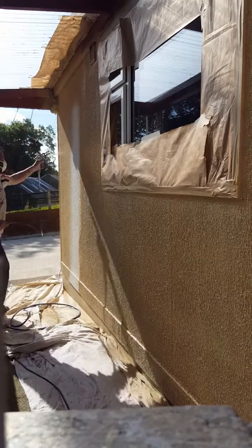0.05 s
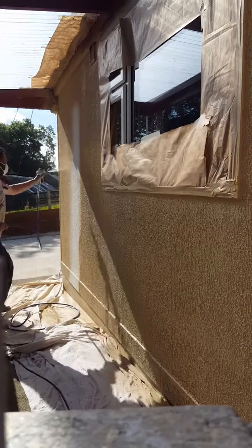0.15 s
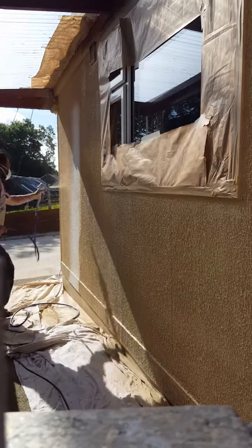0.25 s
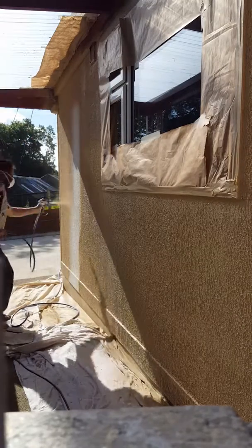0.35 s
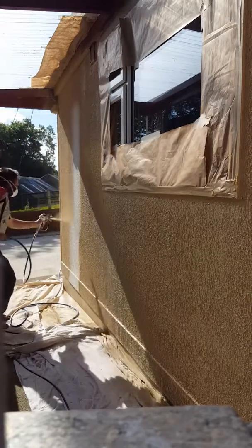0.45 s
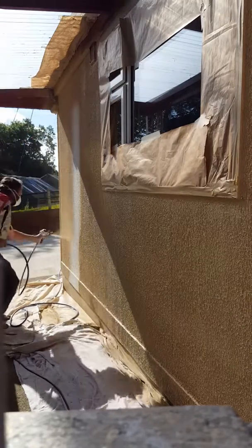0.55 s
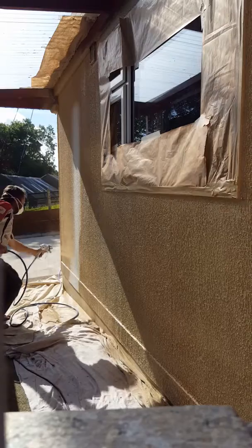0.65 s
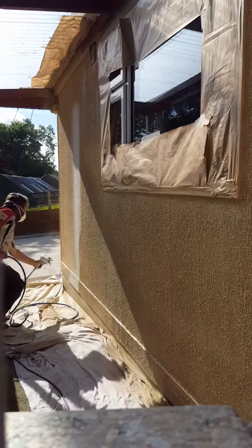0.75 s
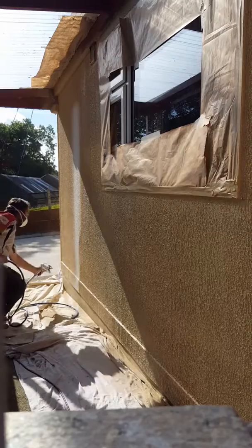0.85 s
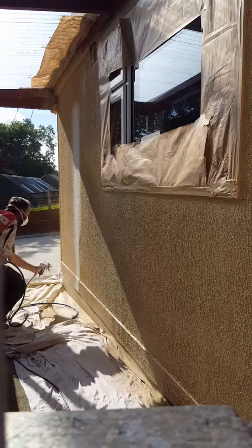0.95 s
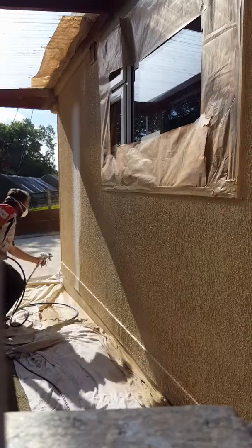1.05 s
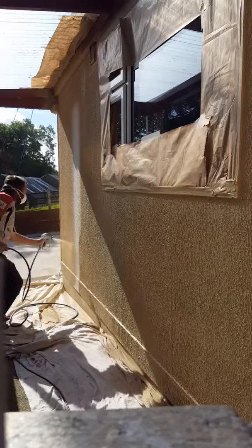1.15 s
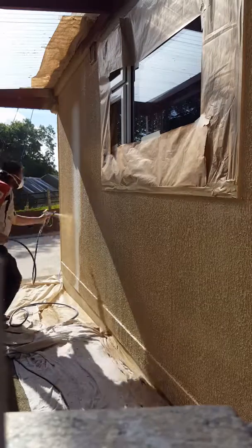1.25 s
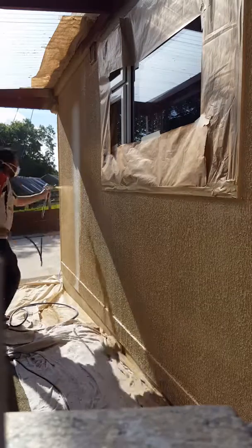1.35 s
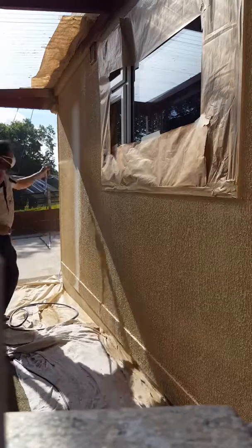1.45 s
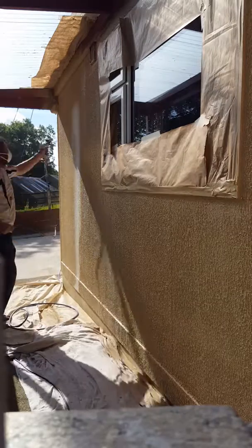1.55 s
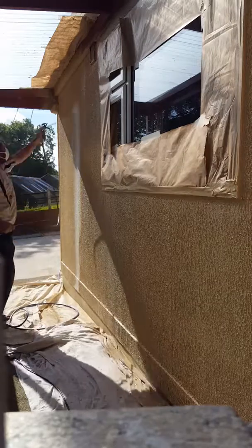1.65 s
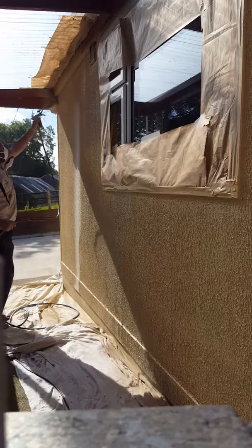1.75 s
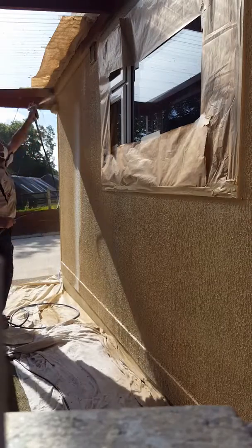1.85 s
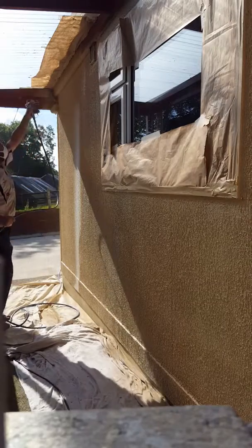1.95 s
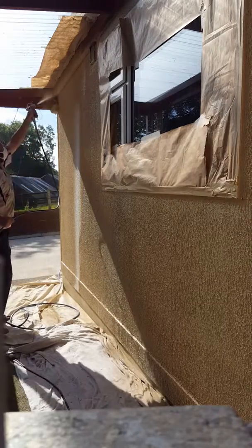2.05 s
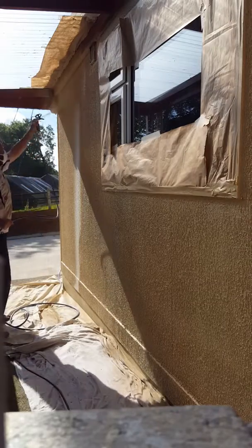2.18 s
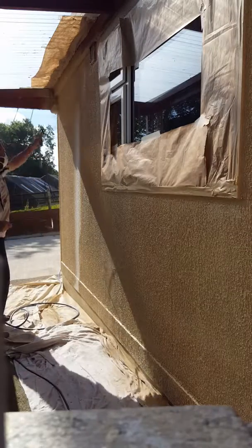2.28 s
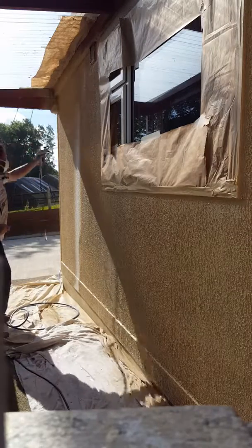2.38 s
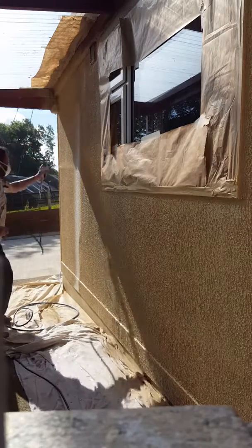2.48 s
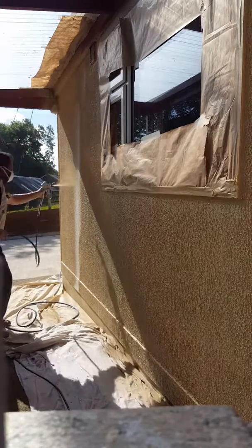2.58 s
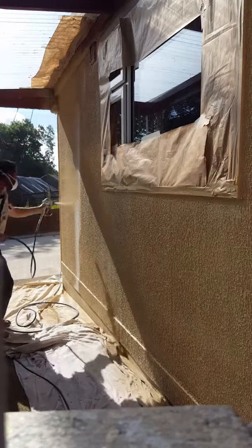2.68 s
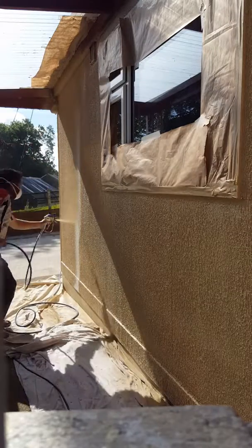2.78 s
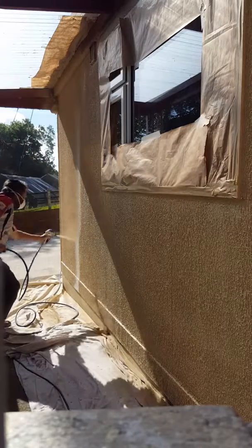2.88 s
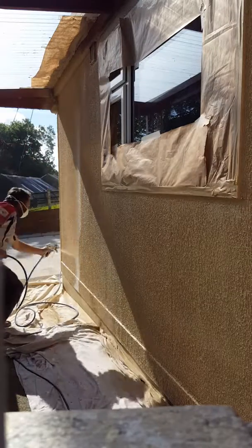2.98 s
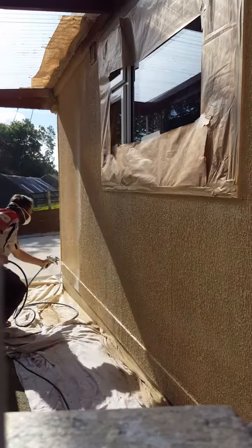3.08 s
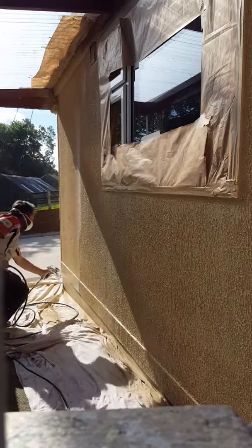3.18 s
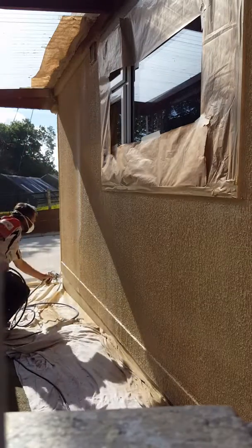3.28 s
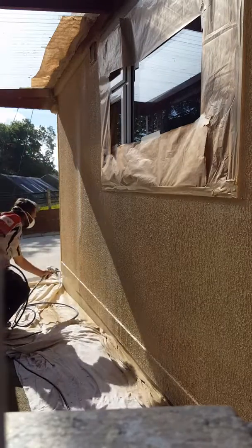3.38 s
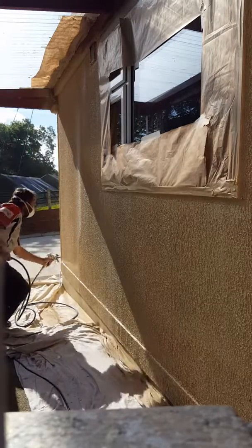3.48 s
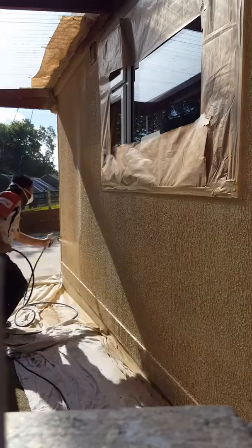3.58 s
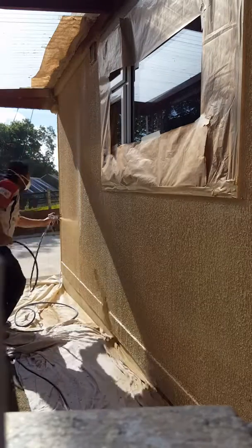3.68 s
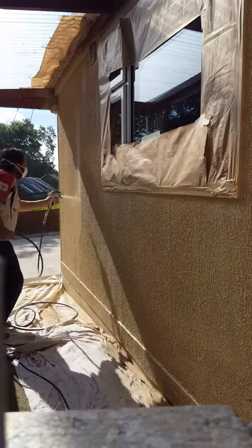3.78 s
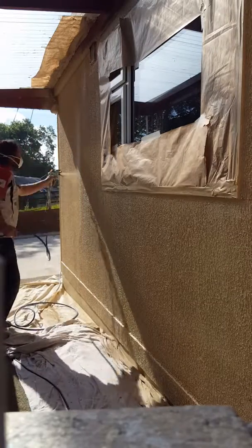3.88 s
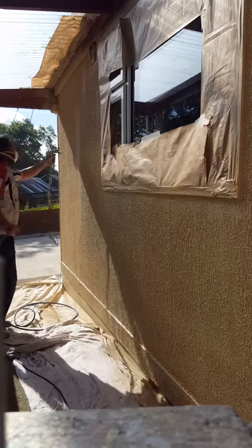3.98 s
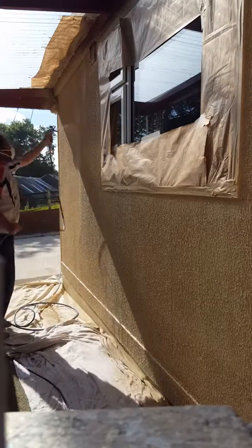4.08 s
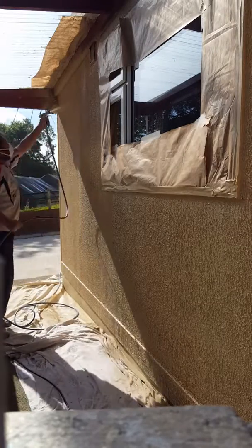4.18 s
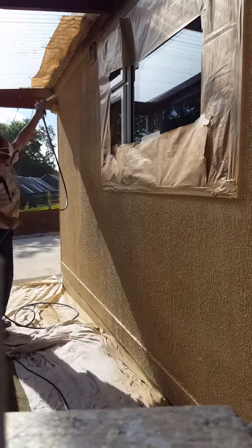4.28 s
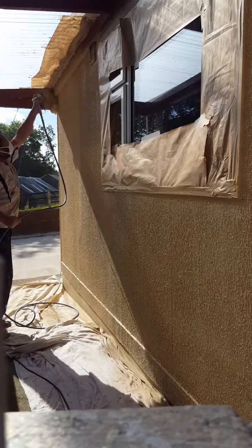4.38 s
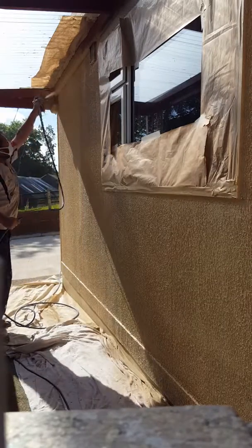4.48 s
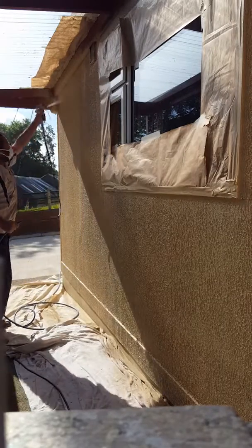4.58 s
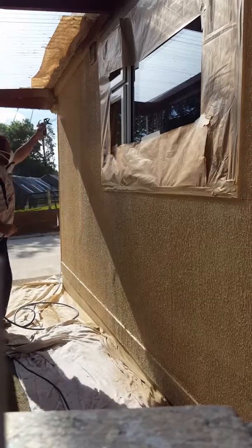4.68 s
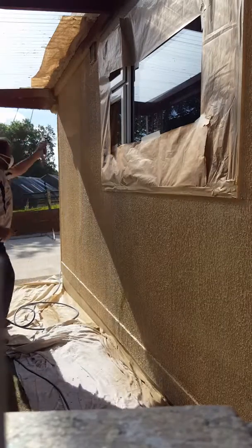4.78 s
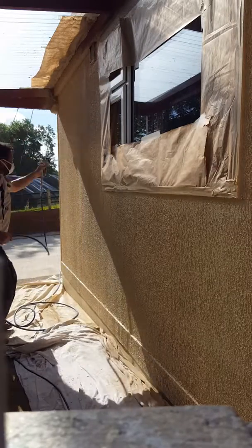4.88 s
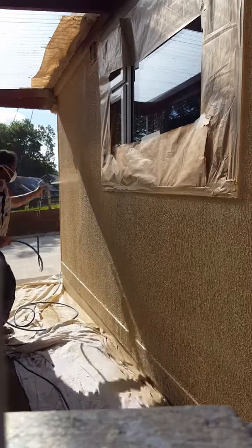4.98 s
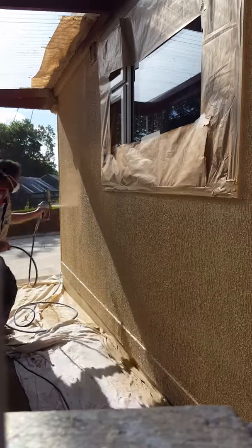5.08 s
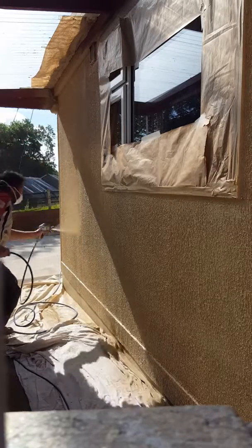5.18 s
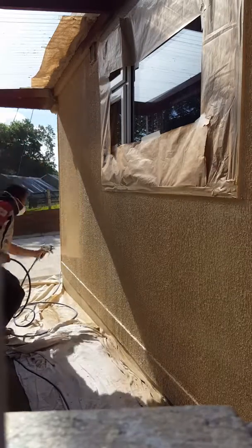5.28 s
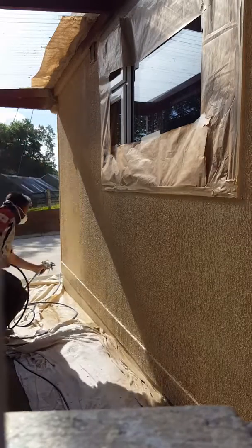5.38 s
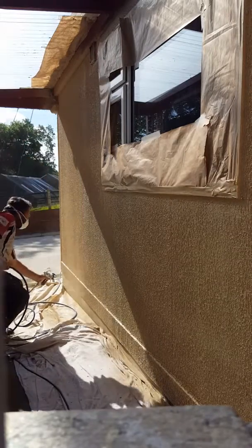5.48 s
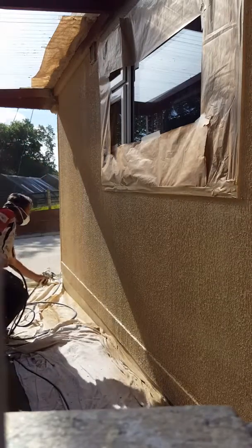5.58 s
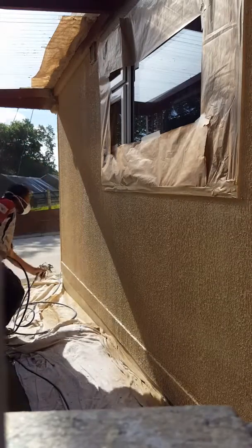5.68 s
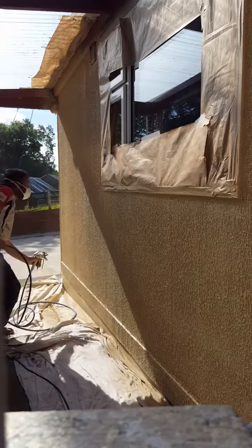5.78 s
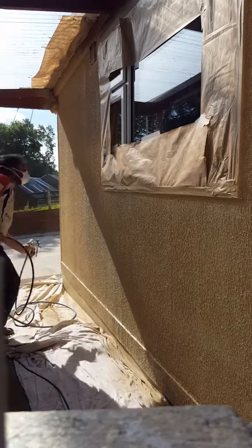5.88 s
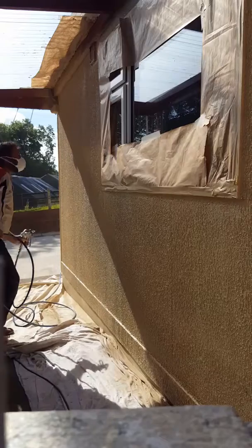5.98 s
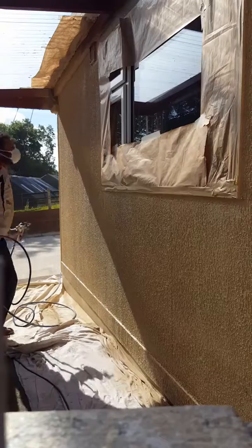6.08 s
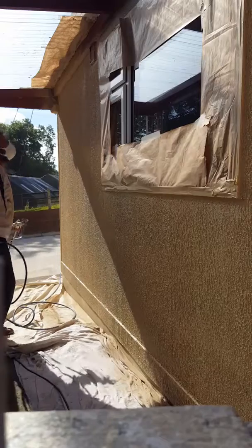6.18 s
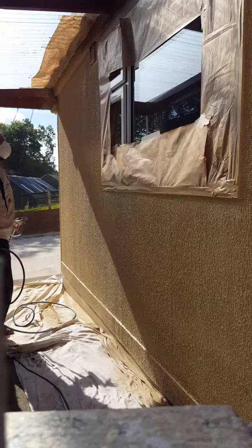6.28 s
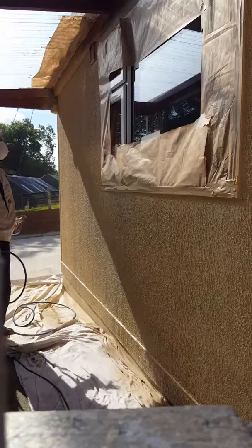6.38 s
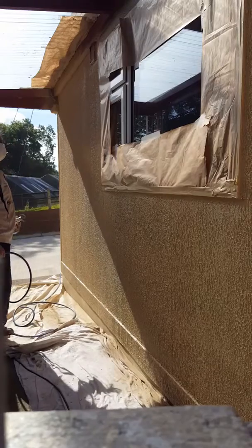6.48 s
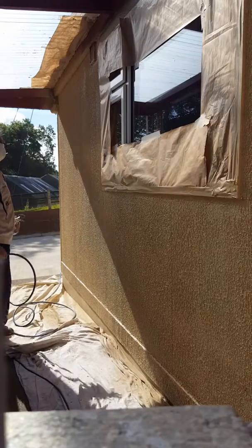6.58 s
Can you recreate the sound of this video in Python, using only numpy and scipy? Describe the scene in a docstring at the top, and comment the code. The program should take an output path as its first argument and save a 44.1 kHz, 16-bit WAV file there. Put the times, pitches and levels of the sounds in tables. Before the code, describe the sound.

In an open yard, a spray gun coats a house wall with a loud, bright hiss, stopping for an instant between five long sweeps. The hiss shifts slightly in tone as the gun moves. Under it, a piston pump knocks rapidly and whirs close by on the right of the stereo microphones. The spraying ends and the pump winds down, leaving a low, faraway engine hum and soft outdoor air.

```python
"""An airless sprayer hisses paint onto an outside wall in five long passes, with short breaks between.
Paint tears into mist at the tip, and echoes off wall, eave and ground shift as the arm moves.
Nearby, a little to the right, its piston pump knocks and whirs, then coasts to a stop once the gun
stays shut. An engine drones further off in the open yard. Two microphones hear it in stereo."""
import sys
import numpy as np
from scipy import signal
from scipy.fft import rfft, irfft
from scipy.io import wavfile
from scipy.ndimage import uniform_filter1d, map_coordinates

SR = 44100
rng = np.random.default_rng(int(sys.argv[2]) if len(sys.argv) > 2 else 0)


def waveform_to_disk(signal):
    """Save audio, clipped to [-1, 1], as 16-bit WAV at the path in sys.argv[1]."""
    frames = np.transpose(np.atleast_2d(signal))
    scaled = np.clip(frames, -1, 1) * 32767
    samples = np.round(scaled).astype(np.int16)
    wavfile.write(sys.argv[1], SR, samples)


N = 293104
TIME = np.arange(N) / SR
BIN_HZ = np.fft.rfftfreq(N, 1 / SR)


def amp(db):
    """Decibels to gain."""
    return 10 ** (np.asarray(db) / 20)


def unit_rms(x):
    """Scales to rms 1."""
    return x / np.sqrt(np.mean(x ** 2) + 1e-20)


def over_hz(points):
    """Reads a curve at every bin, on a log-frequency axis."""
    hz, value = np.transpose(points)
    return np.interp(np.log(BIN_HZ + 1), np.log(hz), value)


def filtered(x, gain):
    """Filters by a gain for each frequency."""
    return irfft(rfft(x) * gain, N)


def lowpass(x, hz, order):
    """Keeps what lies below a frequency."""
    return filtered(x, 1 / (1 + (BIN_HZ / hz) ** order))


def wander(rate_hz):
    """Smooth random drift of rms 1."""
    return unit_rms(filtered(rng.standard_normal(N), np.exp(-(BIN_HZ / rate_hz) ** 2)))


def bell(hz, width_hz):
    """A bell curve of height 1 along frequency."""
    return np.exp(-2 * ((BIN_HZ - hz) / width_hz) ** 2)


def add(mix, start_s, sound):
    """Mixes a sound in at a time."""
    part = mix[max(round(start_s * SR), 0):][:len(sound)]
    part += sound[:len(part)]


# How alike the two microphones hear the air. Each row: frequency in Hz, left-right correlation.
MIC_CORRELATION = [(30, .94), (100, 1), (250, 0.88), (550, 0.5), (1050, 0.65), (1650, -0.42), (2200, -0.29),
                   (2650, 0.48), (3300, -0.066), (14000, 0.093)]


def air_noise(colour_db, left_over_right_db=0):
    """Turbulent noise of rms 1 at the two microphones: alike in the bass, unrelated in the treble."""
    left, unrelated = rng.standard_normal((2, N))
    alike = np.clip(over_hz(MIC_CORRELATION), -1, 1)
    right = filtered(left, alike) + filtered(unrelated, np.sqrt(1 - alike ** 2))
    even = np.ones(len(BIN_HZ))
    tilt = amp(left_over_right_db) * even
    balance = np.array([tilt, even]) / np.hypot(tilt, 1)
    return unit_rms(filtered(np.array([left, right]), amp(colour_db) * balance))


# Open air all round the microphones. Each row: frequency in Hz, relative noise density in dB.
YARD_SPECTRUM = [(15, -66), (30, -20), (65, -7), (120, -1.5), (160, -9), (195, -8), (260, -17.5),
                 (560, -17.5), (720, -14.5), (1150, -12), (2700, -29.5), (4200, -33), (8000, -43.5),
                 (14000, -65)]


def yard(level_db=-43.0, gust_db=3):
    """The soft wash of the open yard, with a rumble that comes and goes beneath it."""
    wash = air_noise(over_hz(YARD_SPECTRUM))
    gusts = lowpass(wash, hz=70, order=8) * (amp(gust_db * wander(5.8)) - 1)
    return amp(level_db) * (wash + gusts)


# The pace of the engine across the yard. Each row: time in seconds, firings per second.
FIRING_RATE = [(0, 21.95), (1.1, 21.9), (1.6, 22.4), (2.7, 22.45), (3.6, 22.25), (5.2, 22.2), (6.65, 22.0)]


def engine(level_db=-46.0, pipe_hz=117, puff_s=0.038, fan_db=-52.0, overtone_db=-57):
    """Further off, each firing puffs through the muffler; the cooling fan hums along."""
    rate = np.interp(TIME, *np.transpose(FIRING_RATE))
    firings = np.cumsum(rate) / SR + 0.0089 * wander(6.3)
    offset_s = (firings % 1 - .5) / rate  # from the middle of each puff
    envelope = np.exp(-.5 * (offset_s / puff_s) ** 2) * np.cos(np.pi * offset_s * rate)
    uneven_db = 0.5 * np.cos(np.pi * (firings - .5)) + 1.5 * wander(24)  # strong and weak, plus chance
    puffs = np.sin(2 * np.pi * pipe_hz * offset_s) * envelope * amp(uneven_db)
    exhaust = amp(level_db) * unit_rms(lowpass(puffs, hz=200, order=10))
    fan_hz = 4.18 * rate
    fan_angle = 2 * np.pi * np.cumsum(fan_hz) / SR + .5 * wander(4.6)
    hum = amp(fan_db) * unit_rms(np.sin(fan_angle) * amp(1.7 * wander(6.3)))
    overtone = amp(overtone_db) * unit_rms(np.sin(2 * fan_angle) * amp(2.4 * wander(10.0)))
    effort_db = 5 * (rate - rate.mean())  # louder as it speeds up
    return (exhaust + hum + overtone) * amp(effort_db)


# The nearby pump: first piston reversal, time between reversals, and the moment its motor cuts out.
FIRST_STROKE_S, STROKE_S, CUT_OUT_S = .082, .18135, 6.12


def motor(full_speed_db=-35, db_per_octave=36, slowing_per_s=.17, coast_s=0.28):
    """Level in dB and share of full speed: after the last pass it labours, cuts out and coasts."""
    shut_s = np.maximum(TIME - SPRAY_PASSES[-1][1], 0)
    labouring = np.clip(1 - slowing_per_s * shut_s, .1, 1)
    coasting = np.exp(-np.maximum(TIME - CUT_OUT_S, 0) / coast_s)
    speed = labouring * coasting
    return full_speed_db + db_per_octave * np.log2(speed), speed


def swell(strokes, centre, width):
    """A hump of height 1 that comes back with every stroke."""
    return np.exp(-(((strokes - centre + .5) % 1 - .5) / width) ** 2)


def piston_load(strokes):
    """The load on the gears, rising and falling between -1 and 1 in each stroke."""
    return np.cos(2 * np.pi * (strokes - .3))


def pump_tone(hz, waver=0, right_db=7, lag_rad=1.38):
    """A tone from the pump: louder at the right microphone, and out of step between the two."""
    angle = 2 * np.pi * np.cumsum(hz * np.ones(N)) / SR + waver
    return unit_rms(np.array([np.sin(angle), amp(right_db) * np.sin(angle - lag_rad)]))


# Faint squeaks of a closing valve.
# Each row: start in seconds, length in seconds, pitch in Hz, bandwidth in Hz, top level in dB.
VALVE_SQUEAKS = [(5.78, .2, 6130, 550, -58), (5.953, 0.1, 6030, 350, -57), (6.144, 0.059, 6530, 50, -57)]


def valve_squeaks():
    """Paint squeezes past a valve seat as the pressure tops out."""
    out = np.zeros(N)
    for start_s, length_s, hz, width_hz, db in VALVE_SQUEAKS:
        whistle = unit_rms(filtered(rng.standard_normal(N), bell(hz, width_hz)))
        out += amp(db) * whistle * np.sin(np.pi * np.clip((TIME - start_s) / length_s, 0, 1))
    return out


# Notes from the pump, off to the right. Each row: peak time in seconds, pitch in Hz, top level in dB.
PUMP_NOTES = [(.04, 1737, -39), (.24, 1737, -39), (1.31, 1737, -40), (2.25, 1737, -42), (2.41, 1737, -41),
              (2.59, 1737, -43), (4.58, 1795, -39), (4.76, 1737, -40), (4.95, 1737, -42), (5.85, 1750, -39)]


def pump_notes(swell_s=0.04):
    """Short clear notes: the housing rings, and once the gear whine stands out between passes."""
    waver = .4 * wander(30)
    return sum(pump_tone(hz, waver) * amp(db) * np.exp(-((TIME - peak_s) / swell_s) ** 2)
               for peak_s, hz, db in PUMP_NOTES)


def gear_whine(strokes, tooth_hz=1805, swing_hz=20, jitter_hz=16, rough_db=4.0, over_motor_db=-9):
    """The gear teeth whine twice in each stroke; the pitch follows motor speed and load."""
    motor_db, speed = motor()
    pitch_hz = tooth_hz * speed + swing_hz * piston_load(strokes) + jitter_hz * wander(131)
    mesh = .25 + swell(strokes, .87, .1) + .7 * swell(strokes, .24, .12)
    envelope = unit_rms(mesh * amp(rough_db * wander(83)))
    return pump_tone(pitch_hz) * envelope * amp(motor_db + over_motor_db)


# The pump's gears from nearby. Each row: frequency in Hz, relative noise density in dB.
GEAR_SPECTRUM = [(200, -20), (320, -11), (410, -2.5), (600, -6), (930, -5.5), (1200, -5.5), (1800, 0.5),
                 (2500, -11), (2850, -15.5), (4500, -15), (6100, -14), (8000, -21), (10000, -36.5),
                 (14500, -52)]
# Resonances of the housing around them. Each row: frequency in Hz, width in Hz, boost in dB.
HOUSING_MODES = [(395, 25, 3), (440, 25, 4), (482, 25, 3), (893, 24, 4), (952, 26, 5), (1091, 28, 5.5),
                 (1340, 28, 4.5), (1435, 40, 4), (1622, 40, 3.5), (1790, 60, 3), (2560, 200, 4)]
# The pump stands to the right. Each row: frequency in Hz, left microphone minus right in dB.
PUMP_BALANCE = [(900, 0.5), (1100, -4), (2000, -6), (5000, -6), (7500, 0)]


def pump_whir(strokes, shaft_hz=55, shaft_db=1.0, load_db=1.0, dip_db=-9, churn_db=-13.0):
    """Gears whir in the housing, louder under each stroke's load, and paint surges through the valves."""
    motor_db, speed = motor()
    colour_db = over_hz(GEAR_SPECTRUM) + sum(db * bell(hz, width) for hz, width, db in HOUSING_MODES)
    shaft_angle = 2 * np.pi * np.cumsum(shaft_hz * speed) / SR + wander(6.7)
    whir = air_noise(colour_db, over_hz(PUMP_BALANCE))
    whir *= amp(shaft_db * np.sin(shaft_angle) + load_db * piston_load(strokes))
    # the low mids of the whir dip twice in each stroke
    dip = swell(strokes, 0.85, 0.018) + 0.51 * swell(strokes, 0.3, 0.075)
    whir += lowpass(whir, hz=720, order=10) * (amp(dip_db * dip) - 1)
    # paint surges around the reversal and again in mid stroke
    surge = swell(strokes, 0.06, 0.18) + 0.43 * swell(strokes, 0.42, 0.1)
    churn = air_noise(over_hz([(150, -48), (250, 15.5), (450, -14), (800, -41.5), (2000, -69)]))
    return amp(motor_db) * (whir + amp(churn_db) * churn * surge)


def reversals(level_db=-39, spread_db=0.5, pause_db=-9):
    """Time and level of each knock while the motor has a full stroke left; softer between passes."""
    times = np.arange(FIRST_STROKE_S, CUT_OUT_S - STROKE_S, STROKE_S)
    paused = sum((times > last[1]) & (times < following[0])
                 for last, following in zip(SPRAY_PASSES, SPRAY_PASSES[1:]))
    return zip(times, level_db + pause_db * paused + spread_db * rng.standard_normal(len(times)))


# Modes of the pump frame. Each row: frequency in Hz, relative level in dB, seconds to fall 60 dB.
FRAME_MODES = [(240, -14, 0.072), (326, 3, 0.048), (388.4, -0.5, 0.092), (470, -10, 0.026),
               (562, -1, 0.061), (655, 3.5, 0.052), (964, 5.5, 0.042), (1083, 6, 0.042), (1317, 4, 0.063)]


def pump_knocks(rattle=0.3, rattle_s=0.014):
    """At each reversal a check ball seats and chatters, ringing the frame; alike at both microphones."""
    t, out = np.arange(SR // 6) / SR, np.zeros(N)
    ring = sum(amp(db - 60 * t / t60) * np.sin(2 * np.pi * hz * t) for hz, db, t60 in FRAME_MODES)
    for start_s, db in reversals():
        blow = rattle * rng.standard_normal(len(t)) * np.exp(-t / rattle_s)
        blow[0] += 2  # the ball hits its seat
        knock = signal.fftconvolve(blow, ring)
        attack_rms = np.sqrt(np.mean(knock[:SR // 100] ** 2))
        add(out, start_s, amp(db) * knock / attack_rms)
    return np.array([out, out])


def wall_echoes(x, share=0.2, count=4):
    """Wall, eave and ground send back early echoes whose paths change as the arm moves."""
    delays_s = [delay * (1 + 0.0494 * wander(1.49)) for delay in np.geomspace(.0014, .009, count)]
    return x + share * sum(map_coordinates(x, [(TIME - delay) * SR], order=3) for delay in delays_s)


# The gun's passes, down the wall and up again in turn.
# Each row: trigger pulled in seconds, trigger let go in seconds, relative level in dB.
SPRAY_PASSES = [(0, 1.083, -25.5), (1.2195, 2.056, -24.5), (2.169, 3.385, -24.6), (3.463, 4.506, -25),
                (4.623, 5.646, -24.5)]


def trigger(snap_s=.0017, spit_s=0.0023, build_s=0.019, first_share=0.49, tail_t60_s=.2):
    """The valve opens with a spit, the fan builds, and on release the hiss dies between wall and eave."""
    envelope = np.zeros(N)
    for pulled, released, _ in SPRAY_PASSES:
        age = np.maximum(TIME - pulled, 0)
        valve = 1 - np.exp(-age / snap_s)
        fan = 1 - (1 - first_share) * np.exp(-age / build_s)
        spit = np.exp(-age / spit_s)
        tail = amp(-60 * np.maximum(TIME - released, 0) / tail_t60_s)
        envelope += valve * (fan + spit) * tail
    return envelope


def arm_sweep(top_db=1, top_treble_db=1.5, sag_treble_db=3):
    """Level and treble in dB: louder and brighter high on the wall, duller as the hose pressure sags."""
    edges_s = [s for pulled, released, _ in SPRAY_PASSES for s in (pulled, released)]
    edge = np.arange(len(edges_s))
    height = np.cos(np.pi * np.interp(TIME, edges_s, (edge + 1) // 2)) / 2
    progress = np.interp(TIME, edges_s, edge % 2)
    pass_db = np.interp(TIME, edges_s, np.repeat([db for _, _, db in SPRAY_PASSES], 2))
    return pass_db + top_db * height, top_treble_db * height - sag_treble_db * progress


# The hiss of the paint fan at the wall. Each row: frequency in Hz, relative noise density in dB.
SPRAY_SPECTRUM = [(450, -39), (750, -18.5), (1200, -19), (2200, -6), (2900, -4.5), (3300, -5.5),
                  (4200, 0.3), (5600, 0), (7300, 1.5), (8400, -2), (9700, -9.5), (11000, -11.5),
                  (13200, -8), (14500, -14.5)]
# Its place between the microphones. Each row: frequency in Hz, left minus right in dB.
SPRAY_BALANCE = [(800, -9), (1800, -2), (4000, -5.5), (7000, -3.5), (8500, 1.5), (14000, 0.5)]


def spray(strokes, gain_db=3, flicker_db=0.96, pulse_db=0.21, fresh_db=1.0, fresh_s=0.5):
    """Paint tears into mist at the tip; echoes comb the hiss as the gun moves along the wall."""
    sweep_db, treble_db = arm_sweep()
    hiss = air_noise(over_hz(SPRAY_SPECTRUM), over_hz(SPRAY_BALANCE))
    treble = filtered(hiss, 1 / (1 + (8000 / (BIN_HZ + 1)) ** 8))
    edge = filtered(hiss, bell(7900, 1500))
    core = filtered(hiss, bell(3400, 1500))
    # pressure stored in the hose makes the start of each pass a little sharper
    fresh = sum((TIME > pulled) * np.exp(-abs(TIME - pulled) / fresh_s) for pulled, _, _ in SPRAY_PASSES)
    hiss += treble * (amp(treble_db - treble_db.mean()) - 1)
    hiss += edge * (amp(fresh_db * (fresh - fresh.mean()) + flicker_db * wander(16)) - 1)
    hiss += core * (amp(flicker_db * wander(22)) - 1)
    hiss = unit_rms(np.array([wall_echoes(side) for side in hiss]))
    pressure_db = pulse_db * np.cos(2 * np.pi * (strokes - .75))  # falling at each piston reversal
    breakup_db = 0.59 * wander(42.4) - 0.17 * wander(910)  # flutter and fine spatter
    return hiss * trigger() * amp(gain_db + sweep_db + pressure_db + breakup_db)


def scene():
    """The gun at the wall, the pump nearby and the engine across the yard, at the two microphones."""
    strokes = (TIME - FIRST_STROKE_S) / STROKE_S  # a whole number at each piston reversal
    gun = spray(strokes)
    pump = pump_whir(strokes) + gear_whine(strokes) + pump_notes() + pump_knocks() + valve_squeaks()
    return gun + pump + engine() + yard()


def suppressor(x, threshold_db=-31, floor_db=-19, low_hz=208, high_hz=640):
    """Turns down low mids that are faint against the loudness of the whole sound."""
    hz, _, spectra = signal.stft(x, SR, nperseg=1024, noverlap=768)
    power = np.mean(abs(spectra) ** 2, axis=0)
    local_power = uniform_filter1d(uniform_filter1d(power, size=5, axis=0), size=5, axis=1)
    band = 1 / (1 + (low_hz / (hz + 1)) ** 12) / (1 + (hz / high_hz) ** 6)
    threshold = amp(threshold_db) ** 2 * band[:, None] * power.sum(axis=0)
    gain = np.maximum(1 / (1 + (threshold / (abs(local_power) + 1e-18)) ** 4), amp(floor_db))
    return signal.istft(spectra * gain, SR, nperseg=1024, noverlap=768)[1][:, :N]


def record(dry, notch_hz=9780, notch_width_hz=1250, band_limit_hz=14560):
    """The right microphone's port cuts a notch; both sides then pass the suppressor and a band limit."""
    notch = np.sqrt(1 - 1 / (1 + ((BIN_HZ - notch_hz) / notch_width_hz) ** 2))
    heard = suppressor(np.array([dry[0], filtered(dry[1], notch)]))
    band_limit = signal.firwin(601, band_limit_hz, window=("kaiser", 8), fs=SR)
    return signal.oaconvolve(heard, band_limit[None], "same", axes=1)


dry = scene()
out = record(dry)
waveform_to_disk(out)
```